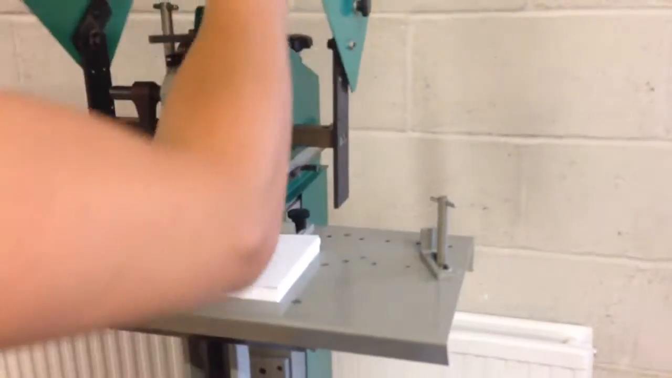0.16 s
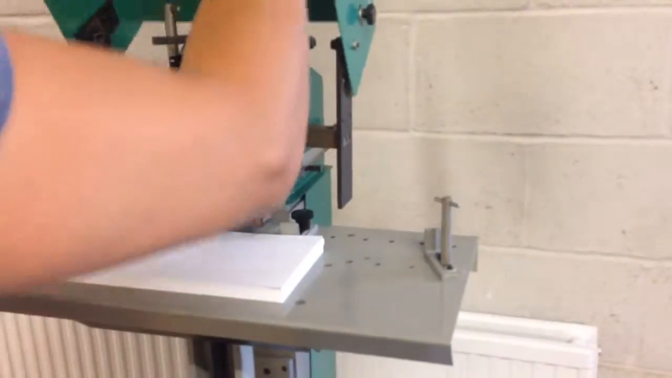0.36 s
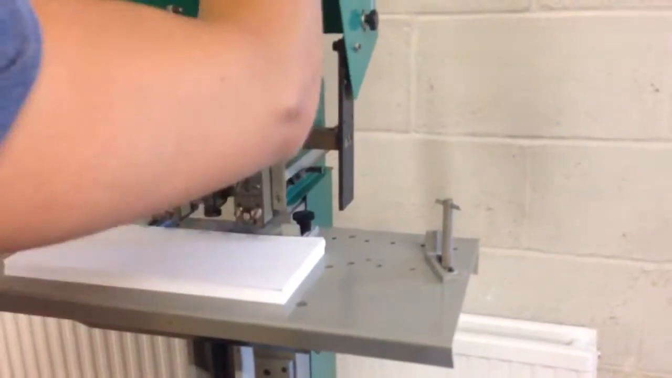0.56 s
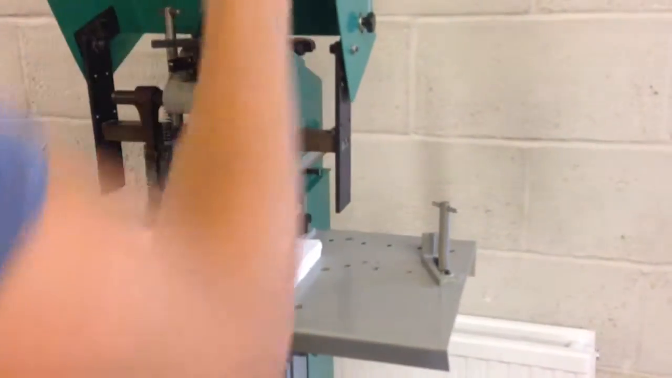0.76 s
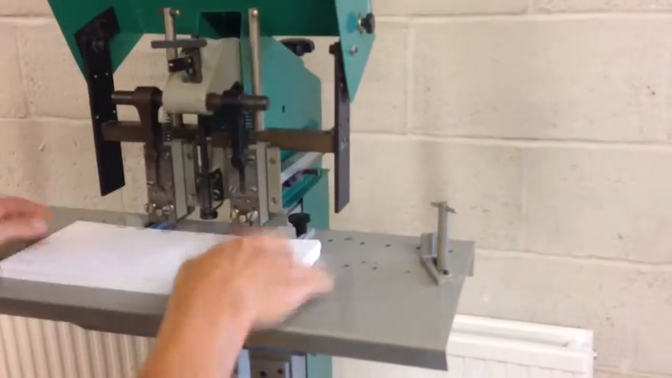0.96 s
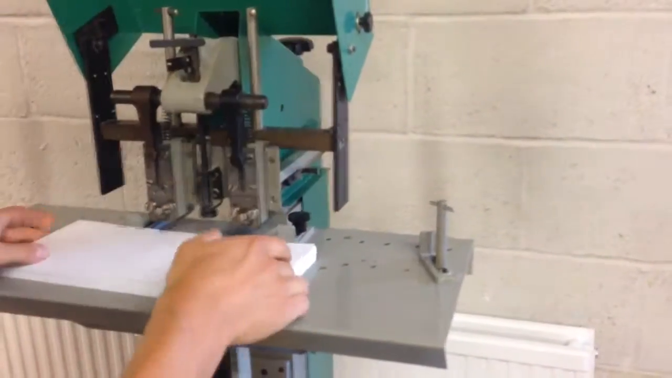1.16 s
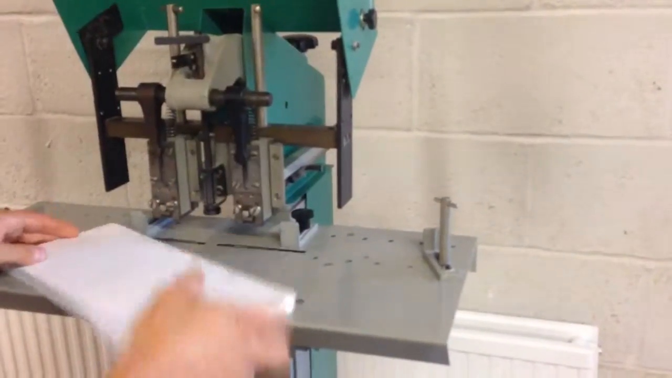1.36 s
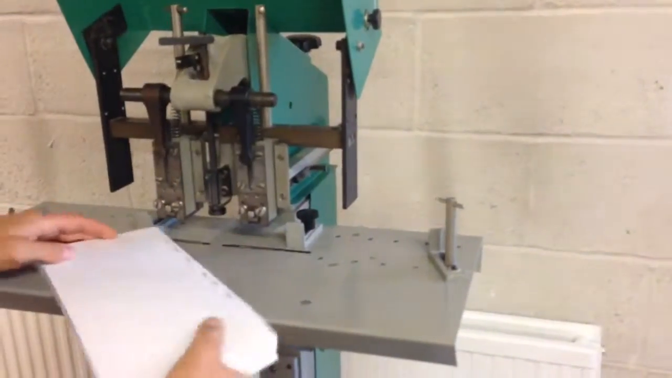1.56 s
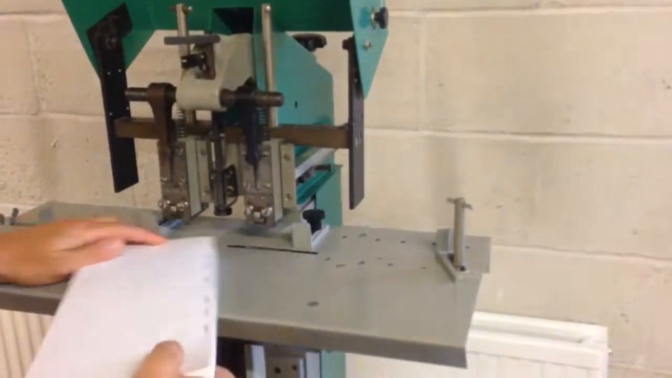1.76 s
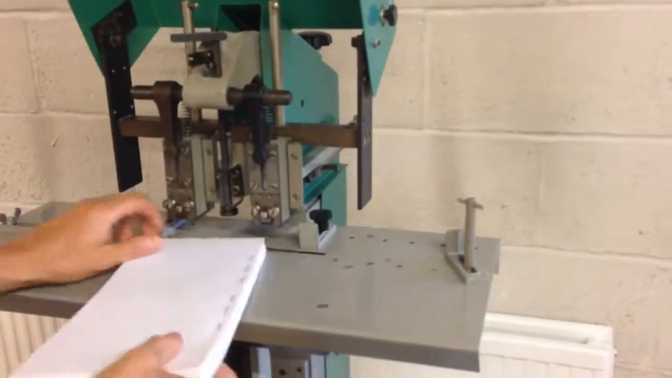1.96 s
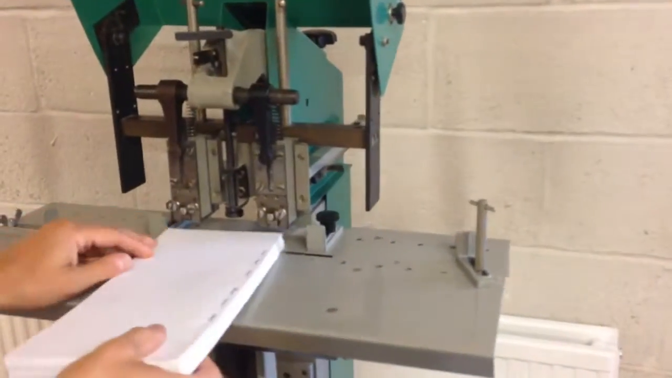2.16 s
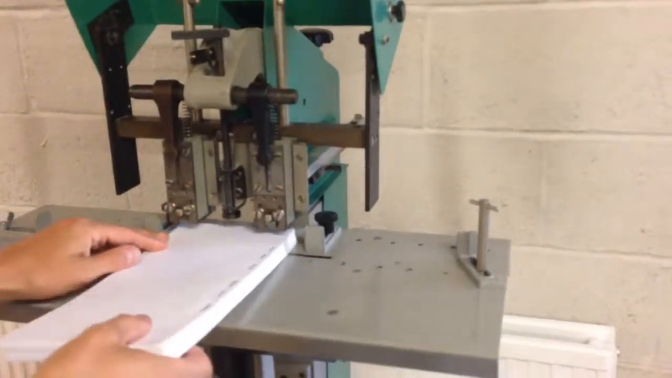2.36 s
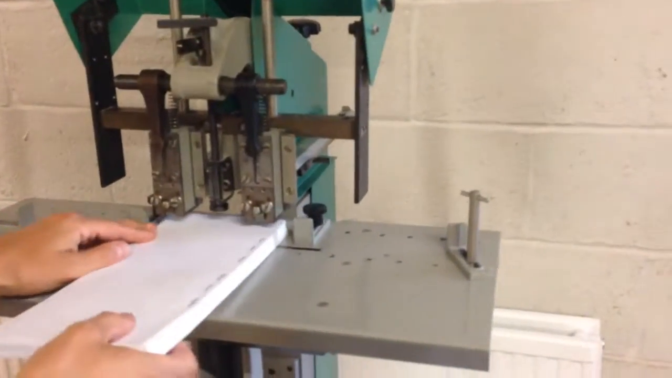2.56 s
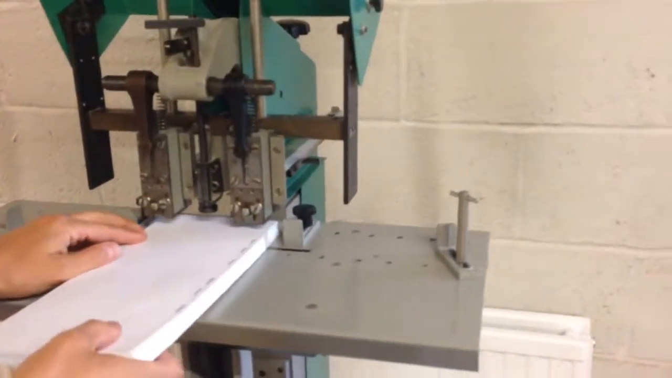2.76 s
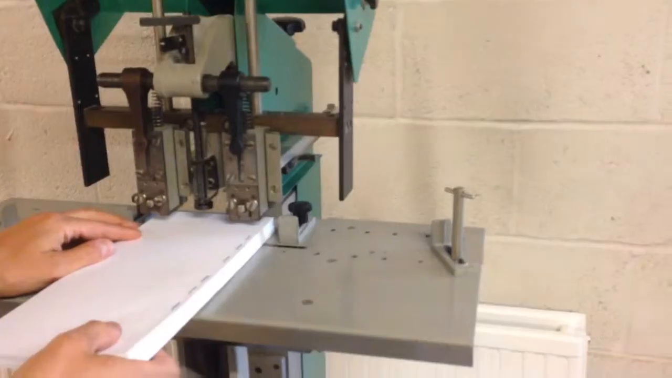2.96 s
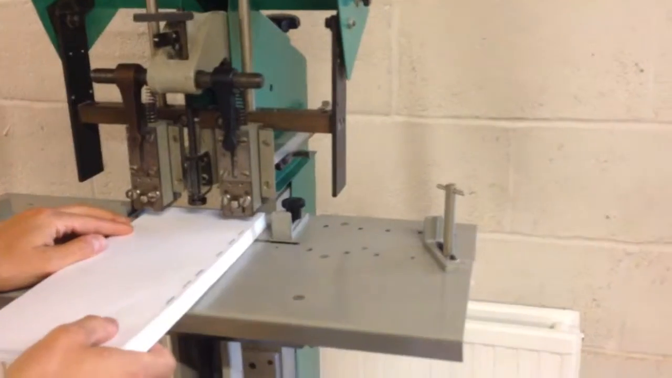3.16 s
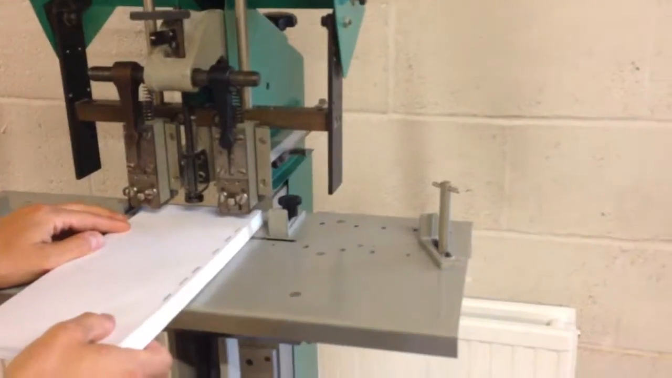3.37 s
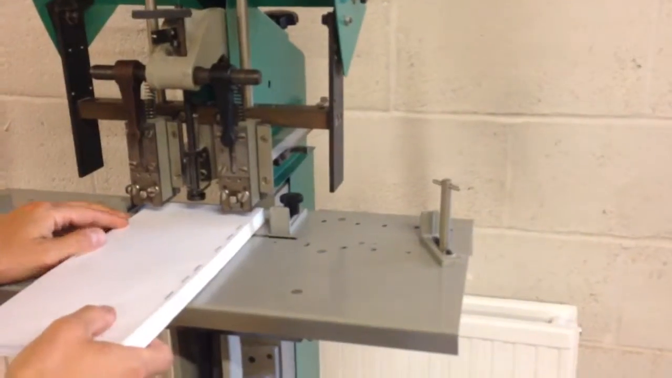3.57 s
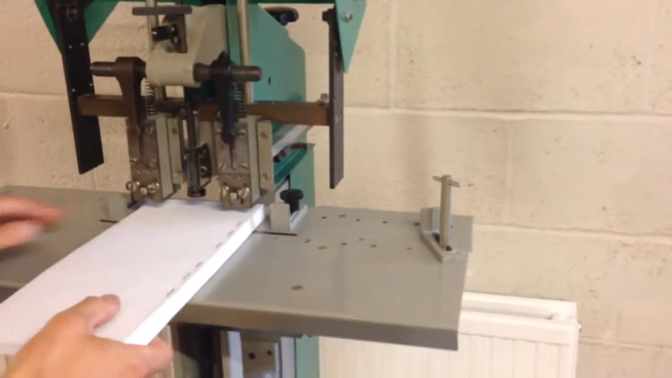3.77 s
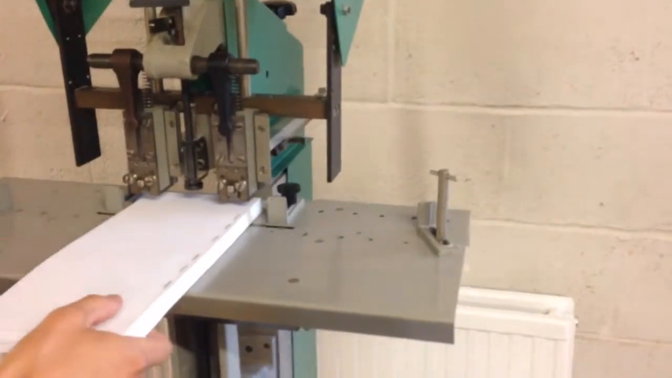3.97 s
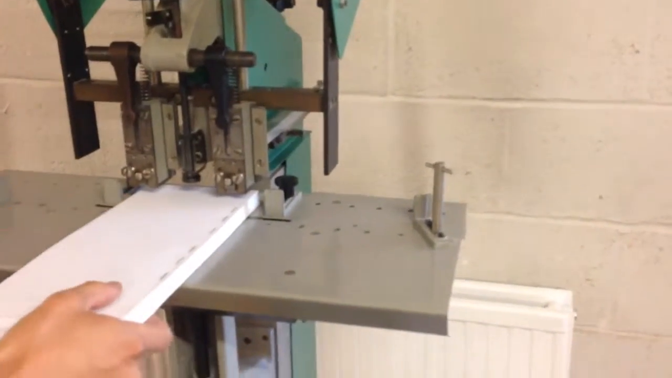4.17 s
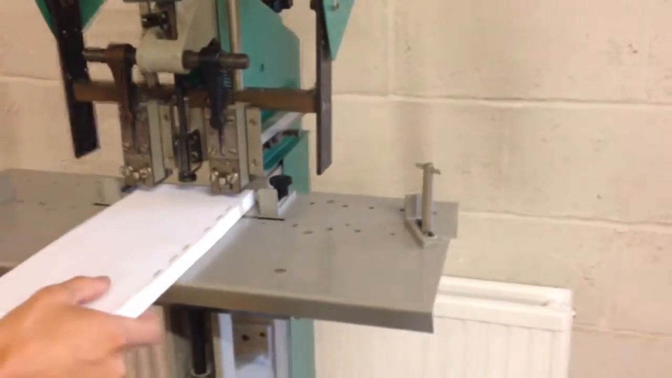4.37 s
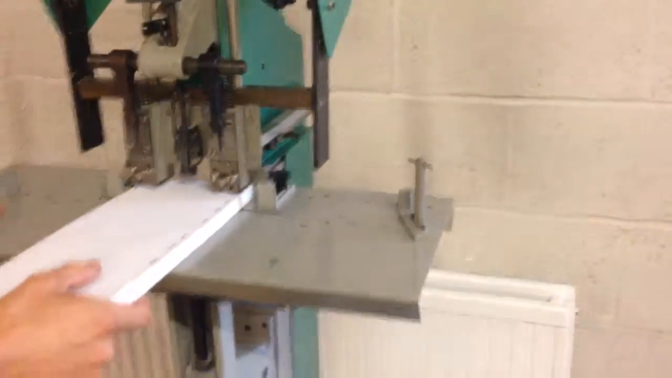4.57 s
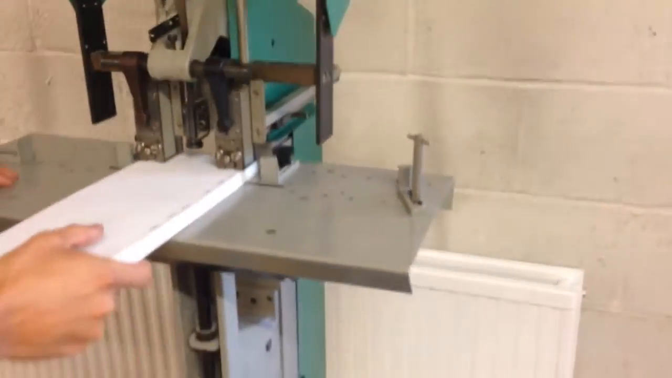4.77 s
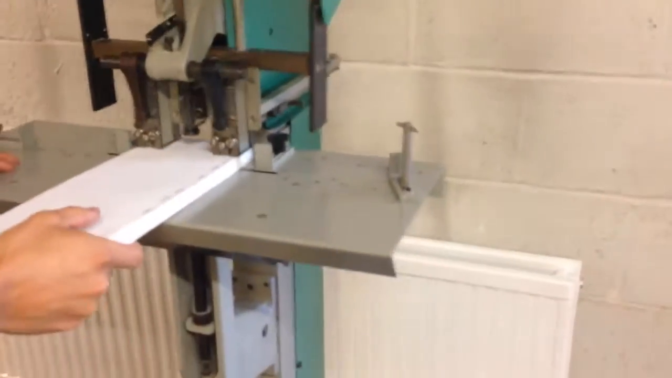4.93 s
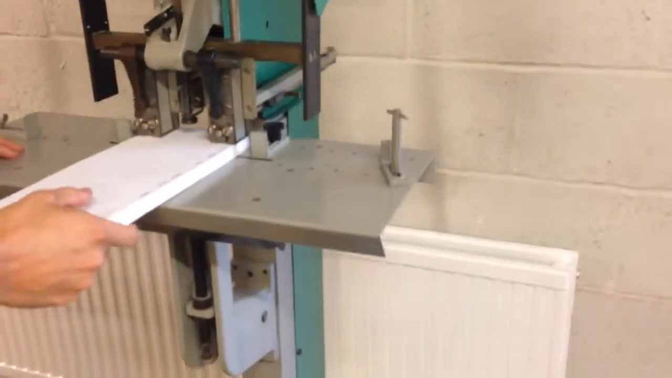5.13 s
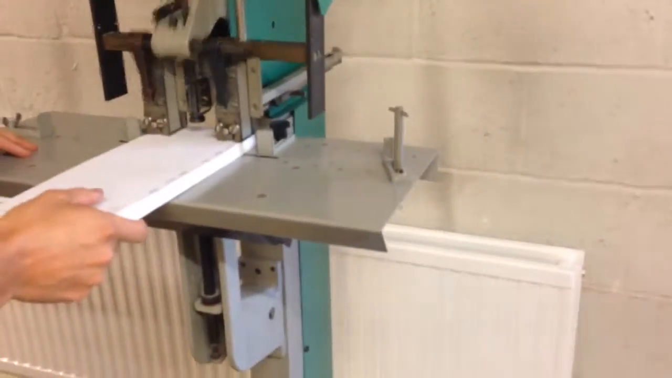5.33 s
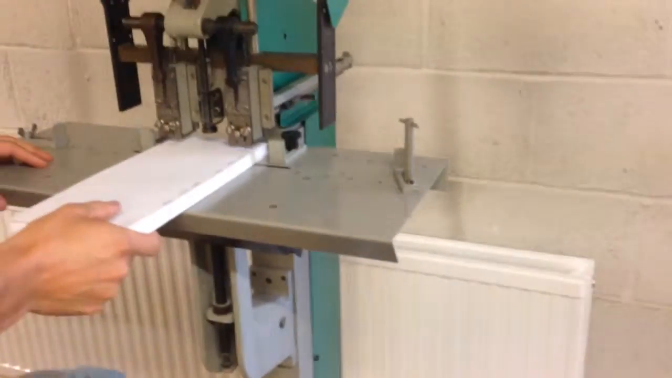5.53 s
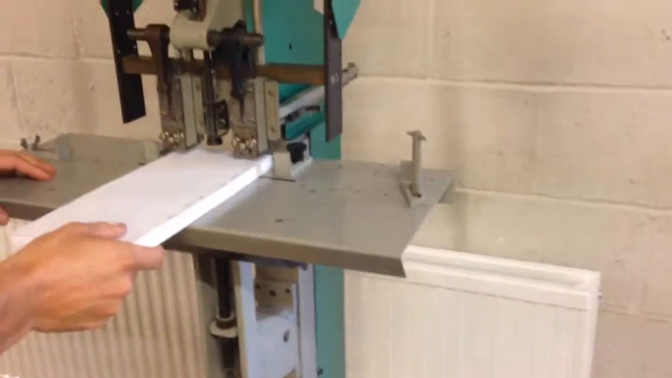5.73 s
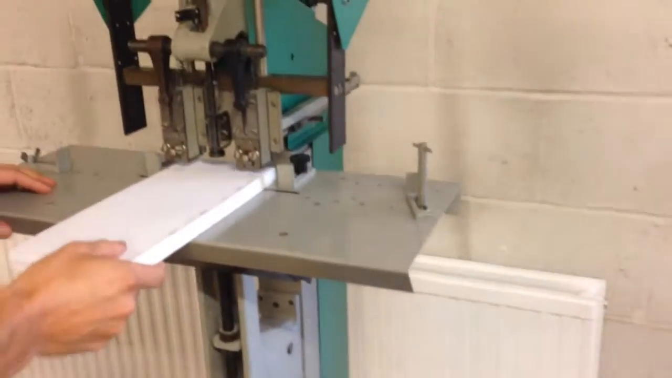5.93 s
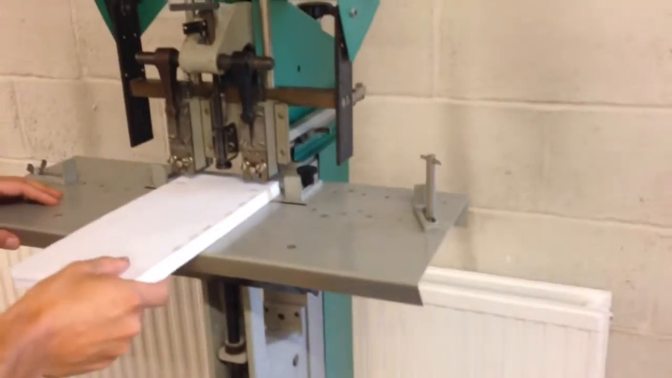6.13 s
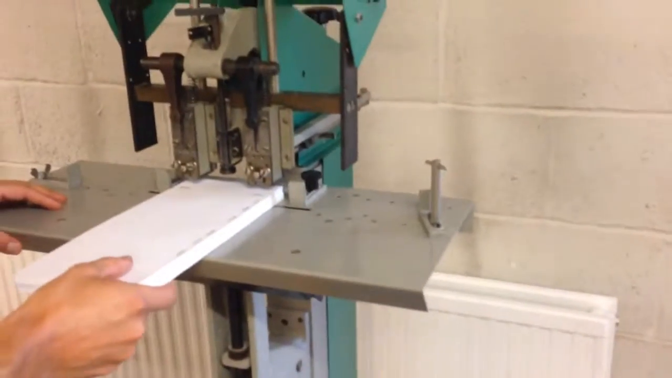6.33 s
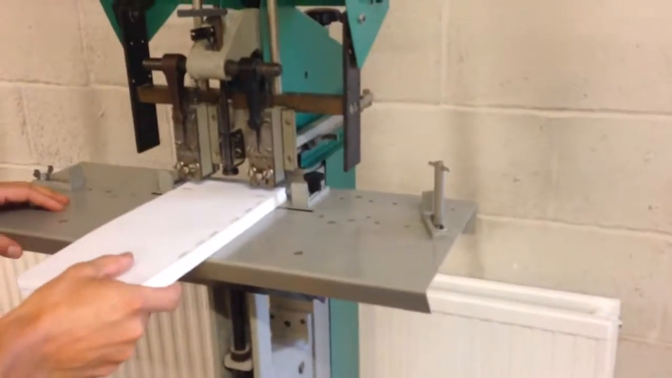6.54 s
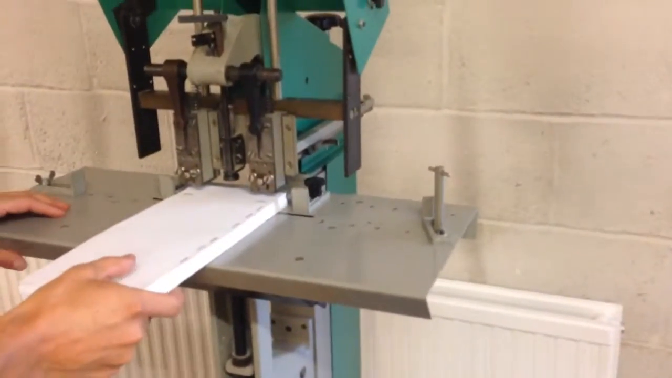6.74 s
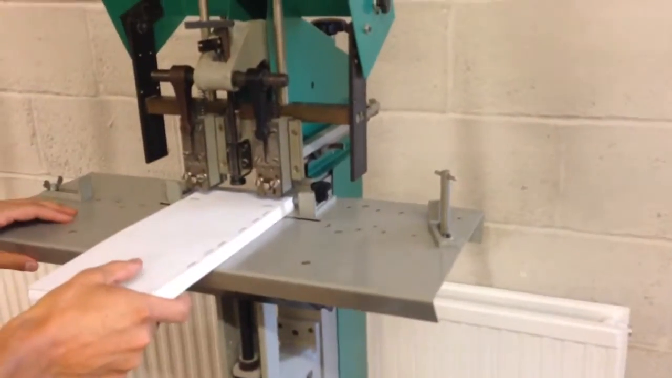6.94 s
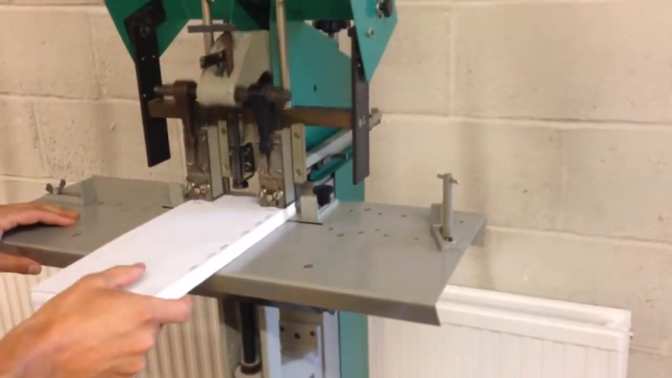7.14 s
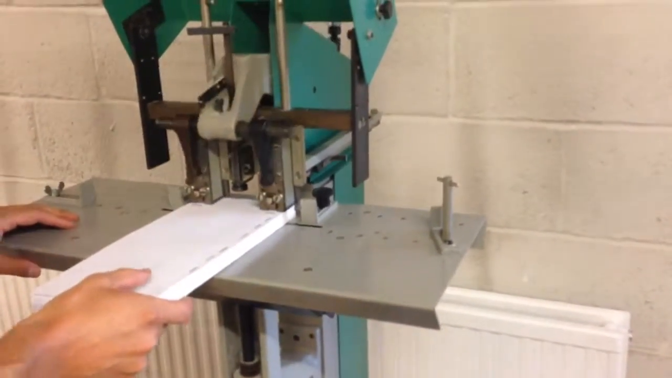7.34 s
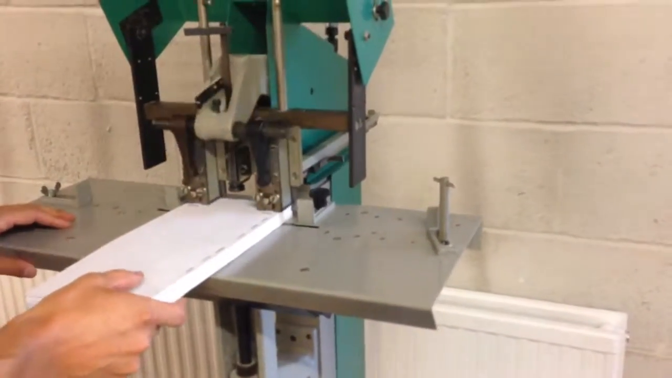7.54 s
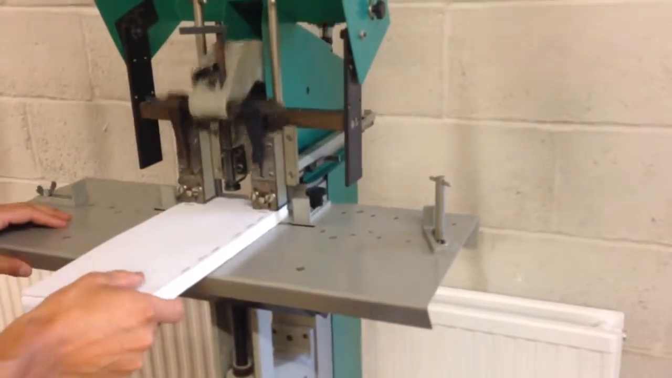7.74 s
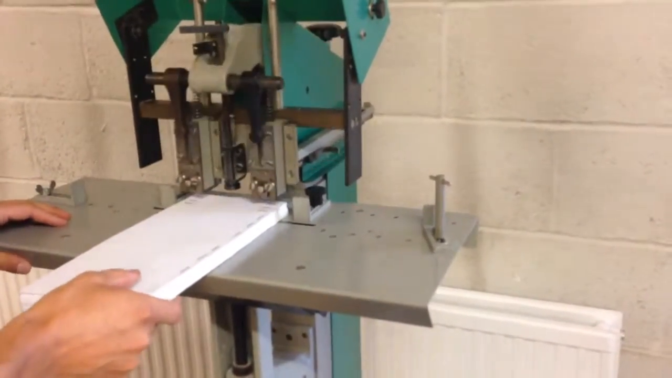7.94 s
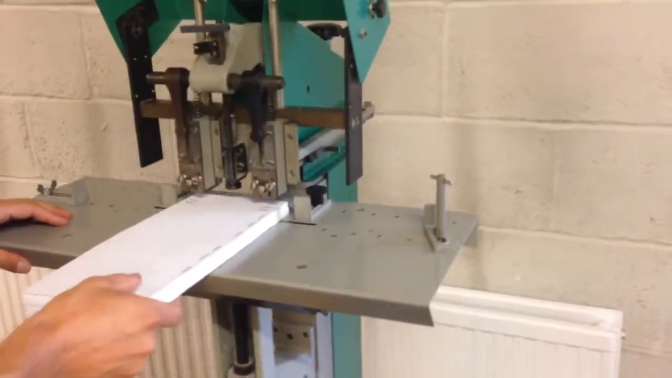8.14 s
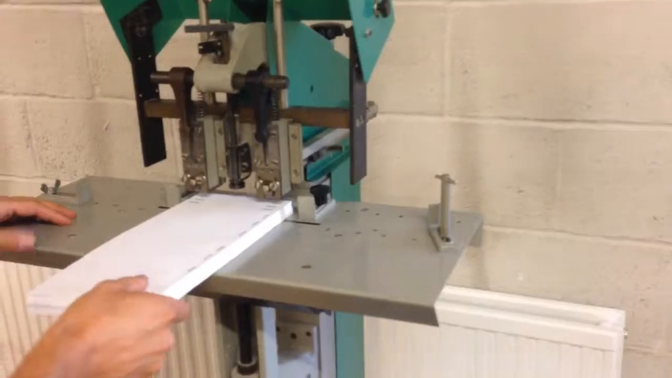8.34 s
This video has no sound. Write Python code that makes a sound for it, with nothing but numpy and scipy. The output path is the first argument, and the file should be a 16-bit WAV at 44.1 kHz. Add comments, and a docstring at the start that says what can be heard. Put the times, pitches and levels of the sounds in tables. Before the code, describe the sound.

Close view of a bench stapling machine in a small hard-walled brick workshop, phone about a metre away. Faint sliding and one sharp latch snap, then a thick paper pad rubs and knocks on a steel table. After a quiet wait, two strokes follow: quick linkage clacks, a heavy slam with a low sagging thud, a spring-back clunk and a small release click.

```python
"""A bench stapling machine in a small brick-walled workshop, heard by a phone a metre away, over room tone.
Linkage slides faintly and a latch snaps; then hands turn a thick paper pad on the steel table, rub and knock.
Two strokes follow: linkage clacks, the drivers slam through the paper, the head springs back, the release clicks.
Blows are bursts of noise that ring modes of the head and the stand; rubs are swelling grainy noise.
The table bows under load as a sagging low note, and dense reflections off the brick surround it all."""
import sys
import numpy as np
from scipy import signal
from scipy.fft import rfft, irfft
from scipy.io import wavfile
from scipy.ndimage import uniform_filter1d, minimum_filter1d

SR = 44100
rng = np.random.default_rng(int(sys.argv[2]) if len(sys.argv) > 2 else 0)


def transcribe(signal):
    """Save signal, clipped to [-1, 1], as a 16-bit WAV file at the path in sys.argv[1]."""
    frames = np.atleast_2d(signal).T
    limited = np.clip(frames, -1, 1)
    pcm = np.round(limited * 32767).astype(np.int16)
    wavfile.write(sys.argv[1], SR, pcm)


def field_ratio(decibels):
    """Amplitude ratio for a level in dB (20 dB per decade); scalars and array-likes work."""
    return 10 ** (np.asarray(decibels, dtype=float) / 20)


N = 370440
T = np.arange(N) / SR


def unit(x):
    """Scale to rms 1."""
    return x / np.sqrt(np.mean(x ** 2))


def unit_energy(x):
    """Scale so that the squares sum to 1."""
    return x / np.sqrt(np.sum(x ** 2))


def decay(t, t60):
    """Exponential fade that reaches -60 dB after t60 seconds."""
    return np.exp(-np.log(1000) * t / t60)


def colour(x, points):
    """Causal minimum-phase filter whose gain follows (Hz, dB) points."""
    hz, db = np.transpose(points)
    log_hz = np.log(np.linspace(1, SR / 2, 2049))
    log_gain = np.interp(log_hz, np.log(hz), db) * np.log(10) / 20
    # folding the cepstrum forward in time makes the filter causal
    cepstrum = irfft(log_gain)
    cepstrum[1:2048] *= 2
    cepstrum[2049:] = 0
    response = irfft(np.exp(rfft(cepstrum)))
    return signal.fftconvolve(x, response)[:len(x)]


def ring(modes, scatter_db=0., length_s=0.43):
    """Sum of decaying sine modes; each blow lands elsewhere, so the gains may scatter."""
    hz, db, t60 = np.transpose(modes)[:, :, None]
    t = T[:int(length_s * SR)]
    db = db + scatter_db * rng.standard_normal((len(modes), 1))
    return np.sum(field_ratio(db) * np.sin(2 * np.pi * hz * t) * decay(t, t60), axis=0)


def damped(modes, factor):
    """The same modes with their ringing times multiplied by a factor."""
    return [(hz, db, t60 * factor) for hz, db, t60 in modes]


def add(out, s, sound):
    """Mix a sound in at time s."""
    i = int(s * SR)
    out[i:i + len(sound)] += sound[:len(out) - i]


def envelopes(rows):
    """Two gain curves: each rub swells to its peak and dies away, overlaps adding in power."""
    power = np.zeros((2, N))
    for peak_s, rise_s, fall_s, *db in rows:
        away = np.where(T < peak_s, (peak_s - T) / rise_s, (T - peak_s) / fall_s)
        # 20 dB down one rise before the peak and one fall after it
        power += field_ratio(np.array(db)[:, None] - 20 * away) ** 2
    return np.sqrt(power)


def grit(spread_db, hold_s=0.0031):
    """Noise whose level jumps from grain to grain."""
    k = int(hold_s * SR)
    grains = np.repeat(rng.standard_normal(N // k + 1), k)[:N]
    return rng.standard_normal(N) * field_ratio(spread_db * grains)


# colour of room tone and microphone hiss: frequency_hz, level_db
AIR_COLOUR = [(40, -29.5), (120, -4), (230, -3.5), (460, -7), (700, -9.5), (1800, -10.5), (2600, -15.5),
              (4100, -14.5), (14800, -19), (16000, -19.5)]


def air():
    """Room tone and microphone hiss: steady coloured noise."""
    return field_ratio(-65.5) * unit(colour(rng.standard_normal(N), AIR_COLOUR))


# slow drift of the rumble: time_s, level_db
RUMBLE_LEVEL = [(0, -60.5), (1.4, -65), (2.8, -69.5), (5.5, -68), (6.2, -74.5), (7, -73), (8.4, -73.5)]
# colour of the rumble: frequency_hz, level_db
RUMBLE_COLOUR = [(18, -37), (36, -1.5), (120, -1.5), (250, -6.5), (600, -51.5)]


def low_rumble():
    """Low noise from outside and from the hand on the phone, drifting in level."""
    level = field_ratio(np.interp(T, *np.transpose(RUMBLE_LEVEL)))
    return level * unit(colour(rng.standard_normal(N), RUMBLE_COLOUR))


def decaying(lo_hz, hi_hz, t60, db):
    """A noise band of reflections that builds up in a few ms and fades exponentially."""
    t = T[:2 * SR]
    band = signal.butter(2, [lo_hz, hi_hz], "band", fs=SR, output="sos")
    fade = (1 - np.exp(-(t / 0.0031) ** 2)) * decay(t, t60)
    return field_ratio(db) * signal.sosfilt(band, rng.standard_normal(len(t))) * unit_energy(fade)


# brick walls: frequency_hz, t60_s, level_db
BRICK_ROOM = [(100, 0.16, 1.5), (300, 0.4, -0.5), (704, 0.45, -3), (1800, 0.45, -1), (4540, 0.44, -4.5),
              (12700, 0.28, -3)]
# the bigger space beyond the door: low_hz, high_hz, t60_s, level_db
FAR_BOOM = (173.5, 336.5, 5, -25.5)


def room(x):
    """Dense reflections off brick: the middle lingers longer than bass and treble, a faint low boom stays."""
    hz, t60, db = np.transpose(BRICK_ROOM)
    tail = decaying(*FAR_BOOM)
    for centre in 90 * 2. ** np.arange(8):  # one octave band after another
        band_t60, band_db = (np.interp(np.log(centre), np.log(hz), column) for column in (t60, db))
        tail = tail + decaying(centre / np.sqrt(2), centre * np.sqrt(2), band_t60, band_db)
    return signal.fftconvolve(x, tail)[:N]


# paper, cloth and shoe rubbing: peak_s, rise_s, fall_s, body_db, hiss_db
RUSTLES = [(1.16, 0.031, 0.26, -64, -84), (1.33, 0.49, .1, -59.5, -65.5), (1.38, 0.025, 0.16, -59.5, -60),
           (1.48, 0.25, 0.055, -55.5, -70), (1.548, 0.033, 0.033, -50, -54),
           (1.745, 0.045, 0.061, -54.5, -48.5), (1.84, 0.28, 0.076, -54.5, -64),
           (3.926, .04, 0.21, -68, -65), (4.47, .09, 0.058, -72, -59), (6.57, 0.038, 0.059, -68.5, -64)]
# colour of the dull rub: frequency_hz, level_db
PAPER_BODY = [(60, -11.5), (200, 8.5), (700, 1.5), (1800, 0), (3500, -34.5), (16000, -34.5)]
# colour of the fine hiss: frequency_hz, level_db
PAPER_HISS = [(1000, -13), (3000, -1), (5000, -4), (9000, -11.5), (16000, -20)]
# modes of stapling head and table, before damping: frequency_hz, level_db, t60_s
HEAD = [(474, -2, .12), (645, 0, .14), (760, -2, .1), (860, -4, .1), (1062, 0, .16), (1260, -1, .12),
        (1342, -2, .15), (1485, -1, .13), (1560, -3, .08), (1710, -1, .18), (1965, -3, .12), (2310, -4, .1),
        (2510, -3, .1), (2780, -5, .1), (3440, -4, .16), (3560, -3, .2), (3640, -4, .18), (3800, -8, .1),
        (4264, -7, .12), (4550, -8, .3), (5545, -9, .2), (5660, -9, .5), (6200, -10, .1), (6500, -8, .06),
        (6810, -10, .2), (7490, -13, .35)]
# modes of the steel stand, before damping: frequency_hz, level_db, t60_s
STAND = [(116, -14.5, 0.062), (170, -2.5, 0.074), (190, -0.5, 0.16), (234.5, 0.5, 0.12),
         (266.4, -5.5, 0.12), (346.3, -8, 0.19), (371.5, -3, 0.35), (472, -9, 0.33), (547, -14, 0.02),
         (645, -10.5, 0.48)]


def rustles():
    """Soft things dragged over steel and floor: a dull rub that also hums in the table, and a fine hiss."""
    body, hiss = envelopes(RUSTLES)
    rub = body * unit(colour(grit(4., hold_s=.01), PAPER_BODY))
    steel = ring(damped(HEAD + STAND[5:], .5))
    hum = signal.fftconvolve(rub, unit_energy(steel))[:N]
    return rub + field_ratio(-13.0) * hum + hiss * unit(colour(grit(2.5), PAPER_HISS))


# linkage sliding: peak_s, rise_s, fall_s, stand_rumble_db, slide_grind_db
SLIDES = [(.014, 0.036, 0.077, -56, -86), (.15, 0.045, 0.63, -64.5, -76), (4.50, 0.019, 0.061, -42, -62),
          (4.545, .02, 0.049, -41, -56), (4.63, .02, 0.18, -38.5, -39.5), (4.696, 0.042, 0.086, -23.5, -35),
          (4.78, .02, 0.073, -32, -34.5), (4.87, 0.093, 0.09, -31.5, -60), (5.24, 0.074, 0.02, -42.5, -62),
          (5.3, 0.034, 0.088, -44, -54.5), (5.385, 0.091, 0.051, -30, -38.5),
          (5.52, 0.057, 0.14, -35.5, -41.5), (7.087, 0.039, 0.045, -36, -43.5),
          (7.16, 0.016, .15, -44, -36.5), (7.216, 0.069, 0.071, -26, -44), (7.33, 0.18, 0.15, -33, -45),
          (7.66, 0.057, .1, -37.5, -62), (7.75, 0.1, 0.058, -30, -34.5), (7.784, 0.1, 0.014, -26, -56),
          (7.9, 0.11, 0.12, -33.5, -35.5), (8.218, 0.023, 0.076, -45, -59.5)]
# colour of the grind: frequency_hz, level_db
GRIND = [(300, -23.5), (900, -4), (2200, -4.5), (3200, -10), (9000, -25), (16000, -35)]


def linkage():
    """Sliding parts grind, chatter in the head's modes and keep the stand humming; they also damp the modes."""
    rumble, grind = envelopes(SLIDES)
    stand, head = (ring(damped(modes, 0.37)) for modes in (STAND, HEAD))
    hum = signal.fftconvolve(rumble * grit(2., hold_s=.012), unit_energy(stand))[:N]
    scrape = grind * unit(colour(grit(5.0), GRIND))
    chatter = signal.fftconvolve(scrape, unit_energy(head))[:N]
    return hum + scrape + field_ratio(-9.5) * chatter


# the table bows under load: start_s, peak_db, length_s, start_hz, end_hz, octave_db (against the note)
BOWS = [(4.911, -9.5, 0.087, 204.8, 125.3, -15), (5.463, -23.5, 0.05, 214, 190, 1),
        (7.374, -6.5, 0.0844, 205.9, 124, -11), (7.836, -11, 0.028, 206.6, 188, -3)]


def table():
    """A swelling, lopsided low note, with its octave, that sags in pitch while the table bows."""
    out = np.zeros(N)
    for s, db, length_s, start_hz, end_hz, octave_db in BOWS:
        u = T[:int(length_s * SR)] / length_s
        phase = 2 * np.pi * np.cumsum(start_hz + (end_hz - start_hz) * u ** 1.3) / SR
        note = np.cos(phase) + field_ratio(octave_db) * np.cos(2 * phase)
        add(out, s, field_ratio(db) * np.sin(np.pi * u) * note)
    return out


# bare contact noise: frequency_hz, level_db
CRACK = [(100, -23.5), (400, -5.5), (1200, -1.5), (3000, -3.5), (6000, -4.5), (10000, -12), (16000, -21)]


def impacts(rows, shiver_t60):
    """Parts chatter while in contact, then loose steel shivers in a dense blur of rattling noise.
    Returns the near sound and what sets off the room."""
    near, send, t = np.zeros(N), np.zeros(N), T[:SR // 2]
    rattle_db, rattle_s = 4., .006  # spread and length of the grains in a shiver
    for s, db, contact_s, bass_db, treble_db, shiver_db in rows:
        u = t / contact_s
        noise = rng.standard_normal((2, len(t)))
        chatter = noise[0] * u * np.exp(1 - u - 0.082 * u ** 2)
        grains = np.repeat(rng.standard_normal(int(.5 / rattle_s) + 2), int(rattle_s * SR))[:len(t)]
        shiver = noise[1] * field_ratio(rattle_db * grains) * (1 - np.exp(-u)) * decay(t, shiver_t60)
        click = 1. * (t == 0)
        # heavy parts add bass, hard small parts add treble
        tone = [(700, bass_db), (2500, 0), (9000, treble_db)]
        chatter, shiver, click = (colour(colour(v, CRACK), tone) for v in (chatter, shiver, click))
        # the loudest 80 samples of each come to rms 0.5
        chatter, shiver = (v / np.sqrt(np.max(uniform_filter1d(v ** 2, size=80))) / 2
                           for v in (chatter, shiver))
        sound = field_ratio(db) * (chatter + field_ratio(shiver_db) * shiver)
        add(near, s, sound)
        # the walls hear every side of the machine at once: one even click of the same energy
        add(send, s + contact_s, unit_energy(click) * np.sqrt(np.sum(sound ** 2)))
    return np.array([near, send])


def struck(rows, modes, push_s, octave_db, scatter_db):
    """Each blow is a short smooth push that rings the modes near its favoured pitch."""
    out = np.zeros(N)
    force = np.hanning(int(push_s * SR) + 2)
    for s, db, near_hz in rows:
        # modes weaken by octave_db per octave away from the favoured pitch
        chosen = [(hz, g + octave_db * abs(np.log2(hz / near_hz)), t60) for hz, g, t60 in modes]
        sound = signal.fftconvolve(force, ring(chosen, scatter_db))
        add(out, s, field_ratio(db) * sound / np.max(np.abs(sound)))
    return out


# voice of each part as it strikes: favoured_head_hz, favoured_stand_hz, bass_db, treble_db, shiver_db
PARTS = {"latch": (1692, 190, 5, -1.5, -6), "pedal": (1295, 216, -6.5, -11, -6.5),
         "pawl": (3520, 199, -1.5, -9, -17), "former": (3900.5, 197, -25, 4, -2.5),
         "cutter": (3641, 217.5, -16.5, -0.5, -11.5), "guide": (3561.5, 169.5, -3, -2, -7),
         "touch": (1249.5, 330, -5.5, -4, -5.5), "driver": (1278, 346.5, 3, -7, -17.5),
         "clinch": (701.5, 385.5, 6, -0.5, -11), "lift": (650.5, 302, -3, -5, -7.5),
         "catch": (6801, 309.5, -26, 4.5, -11.5), "stop": (1095, 245, 3.5, -1, -18.5),
         "spring": (5603.5, 199, -10, 0, -6), "release": (2580, 541, -2.5, -15, -6),
         "pad edge": (1052, 385, 7.5, -38, -0.5), "corner": (1300, 443, -1, -45, -12),
         "finger": (1000, 168, 9, -24, -11.5)}
# time scale of each part's contact chatter: contact_s
CONTACT_S = {"latch": .011, "pedal": .004, "pawl": .003, "former": .0062, "cutter": .0048, "guide": .0045,
             "touch": .005, "driver": .0077, "clinch": .006, "lift": .004, "catch": .0008, "stop": .006,
             "spring": .003, "release": .0014, "pad edge": .007, "corner": .003, "finger": .0015}


def blows(rows, shiver_t60, damping):
    """A part's contact chatters, then the head rings and the stand booms near the part's own pitches."""
    head_modes, stand_modes = damped(HEAD, damping), damped(STAND, damping)
    contact = impacts([(s, db, CONTACT_S[part], *PARTS[part][2:]) for s, part, db, _, _ in rows], shiver_t60)
    # a share of every contact rings on in all modes of the head
    body = unit_energy(ring(damped(head_modes, 0.69)))
    clatter = signal.fftconvolve(contact, body[None])[:, :N]
    # the blow takes a moment to reach head and stand
    head_lag_s, stand_lag_s = .004, .011
    head_rows = [(s + head_lag_s, db, PARTS[part][0]) for s, part, _, db, _ in rows]
    stand_rows = [(s + stand_lag_s, db, PARTS[part][1]) for s, part, _, _, db in rows]
    stand = struck(stand_rows, stand_modes, push_s=0.0028, octave_db=-13.5, scatter_db=0.0)
    head = struck(head_rows, head_modes, push_s=.0001, octave_db=-18.5, scatter_db=3.0)
    return contact + field_ratio(-14.5) * clatter + stand + head


# pad and fingers knocking on the table: start_s, part, contact_db, head_db, stand_db
HANDS = [(1.148, "pad edge", -46.5, -41, -41), (1.465, "pad edge", -47, -57, -43),
         (1.534, "corner", -36.5, -50, -56), (1.564, "corner", -36, -35, -40),
         (1.628, "corner", -36.5, -28.5, -36), (1.673, "pad edge", -43, -52, -50),
         (1.700, "finger", -64, -60, -36), (2.144, "pad edge", -49.5, -43, -41),
         (2.474, "pad edge", -51, -45, -44), (3.170, "pad edge", -57.5, -51, -46.5),
         (3.323, "finger", -65.5, -70, -57), (6.418, "pad edge", -62.5, -65.5, -53),
         (6.644, "finger", -48.5, -66, -46)]


def hands():
    """Dull knocks, their ringing shortened by paper and hands on the steel; they reach the walls less."""
    near, send = blows(HANDS, shiver_t60=0.11, damping=0.6)
    return np.array([near, field_ratio(-1) * send])


# metal on metal: start_s, part, contact_db, head_db, stand_db
MACHINE = [(.502, "latch", -23, -25.5, -22.5), (4.491, "pedal", -74, -59, -44),
           (4.516, "pawl", -54, -45, -65), (4.540, "pawl", -46, -36, -52),
           (4.618, "former", -20, -16.5, -29), (4.689, "cutter", -19, -21.5, -17),
           (4.775, "guide", -21.5, -19, -19), (4.902, "touch", -16.5, -20, -50),
           (4.908, "driver", -8.5, -16.5, -4.5), (4.922, "clinch", -7.5, -19, -16),
           (5.291, "lift", -50, -57.5, -38.5), (5.336, "catch", -19, -49, -41),
           (5.457, "touch", -25.5, -46, -41.5), (5.464, "stop", -10, -28.5, -13.5),
           (5.470, "spring", -39.5, -45, -21.5), (5.943, "release", -30, -48, -43),
           (7.038, "pedal", -56, -56, -42.5), (7.054, "pedal", -30.5, -33, -25),
           (7.148, "former", -22.5, -23, -39), (7.203, "cutter", -18, -49, -17),
           (7.272, "guide", -24.5, -39, -19), (7.361, "touch", -14.5, -9.5, -31),
           (7.368, "driver", -11, -21, -3), (7.381, "clinch", -3, -18, -9.5),
           (7.677, "lift", -38.5, -26.5, -47), (7.693, "lift", -36, -43, -40),
           (7.710, "catch", -17, -44, -47), (7.831, "touch", -18.5, -35, -48),
           (7.838, "stop", -9, -11.5, -13.5), (7.843, "spring", -45, -30, -39),
           (7.965, "pedal", -31, -51, -26), (8.206, "lift", -57, -54, -48), (8.228, "lift", -58, -56, -57),
           (8.331, "release", -30, -37, -34.5)]


def machine():
    """Latch, linkage, drivers, spring and release strike steel, which rings longer than under the hands."""
    return blows(MACHINE, shiver_t60=0.15, damping=0.79)


def radiated(x):
    """The small machine radiates little deep bass; the floor passes a little of the deepest thud."""
    deep = signal.sosfilt(signal.butter(3, 56, fs=SR, output="sos"), x)
    return field_ratio(-15.5) * deep + signal.sosfilt(signal.butter(3, 155, "high", fs=SR, output="sos"), x)


def scene():
    """Machine and hands in the room, over the room tone."""
    near, send = machine() + hands()
    rubbing = linkage() + rustles()
    bows = table()
    # the bowing table aims at the phone more than at the walls
    reflections = room(send + rubbing + field_ratio(-9.5) * bows)
    heard = radiated(near + rubbing + bows + reflections)
    return (heard + air() + low_rumble())[None]


def top_cut(x):
    """Nothing passes above the cut-off."""
    return signal.sosfilt(signal.butter(12, 16470, fs=SR, output="sos"), x)


def record(dry):
    """The phone limits the loudest blows and cuts the top."""
    limit_db, top_hz = -4., 15400
    peak = -minimum_filter1d(-np.abs(dry), size=441)  # highest level within 10 ms
    gain = np.minimum(1, (field_ratio(limit_db) / peak) ** .8)
    limited = dry * uniform_filter1d(gain, size=441)
    mix = signal.sosfilt(signal.ellip(8, .2, 60, top_hz, fs=SR, output="sos"), limited)
    return top_cut(mix)


dry = scene()
out = record(dry)
transcribe(out)
```